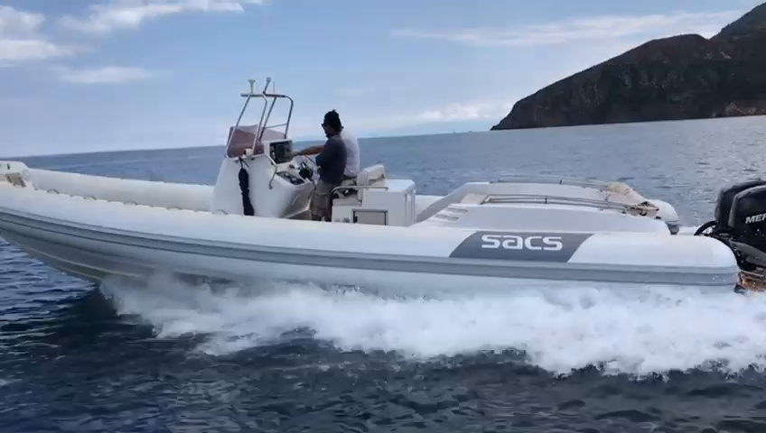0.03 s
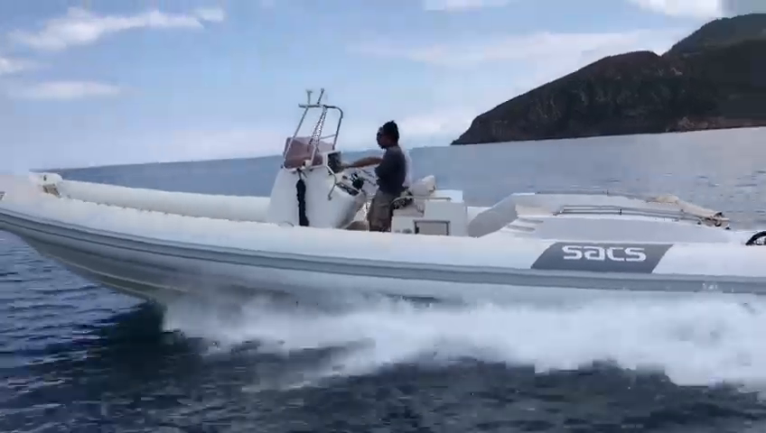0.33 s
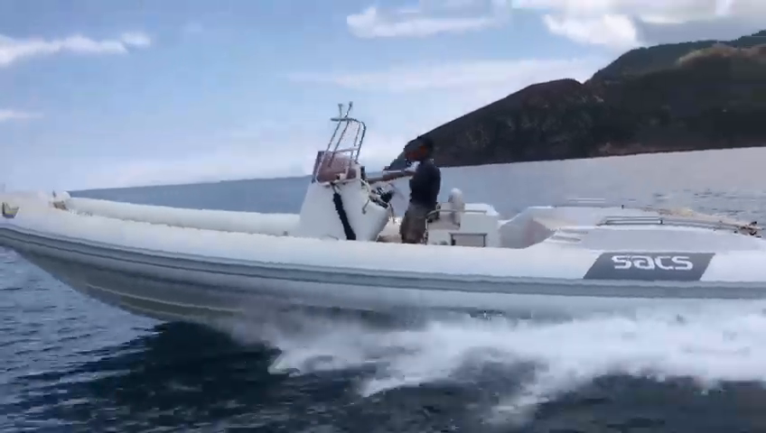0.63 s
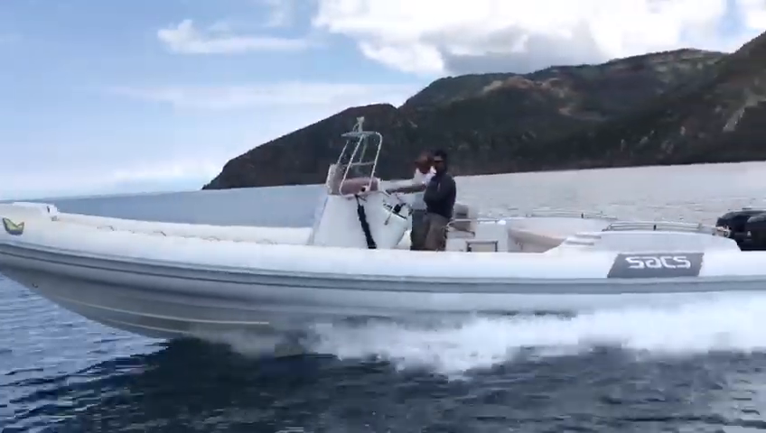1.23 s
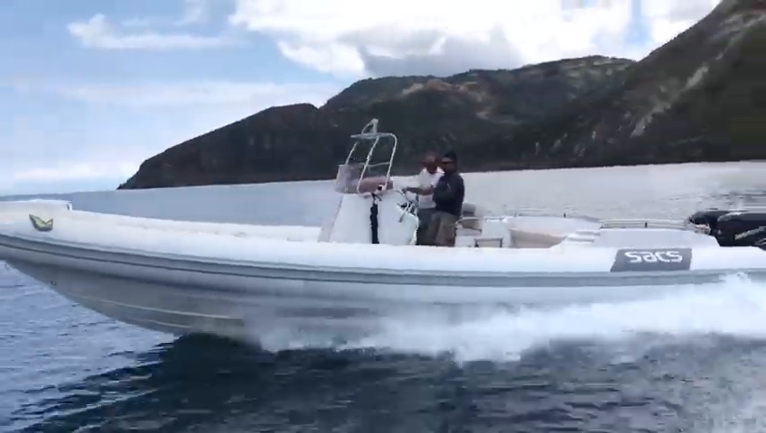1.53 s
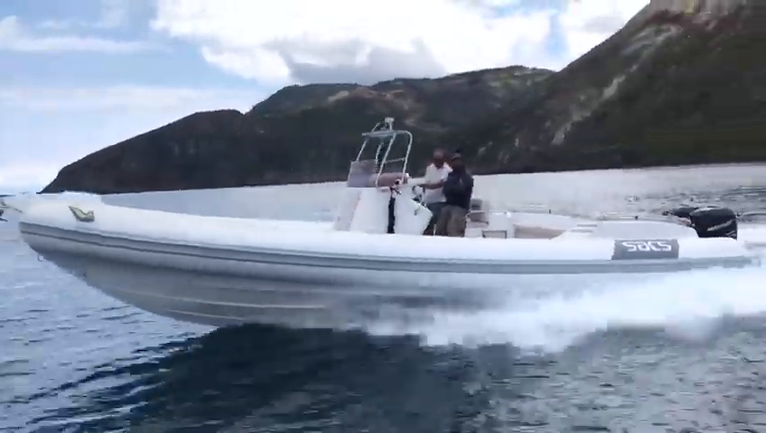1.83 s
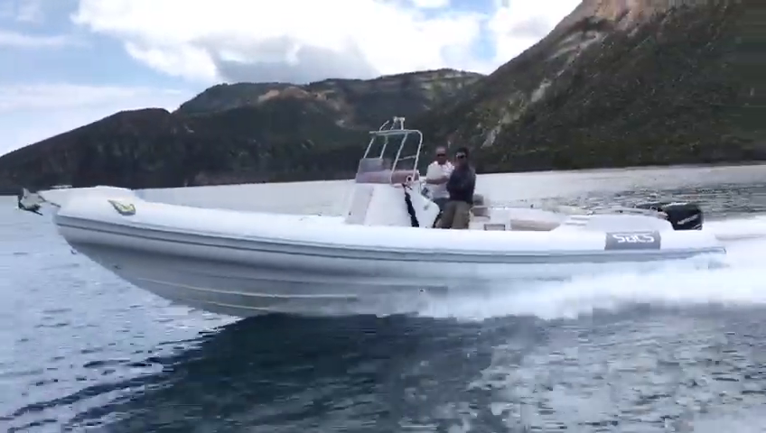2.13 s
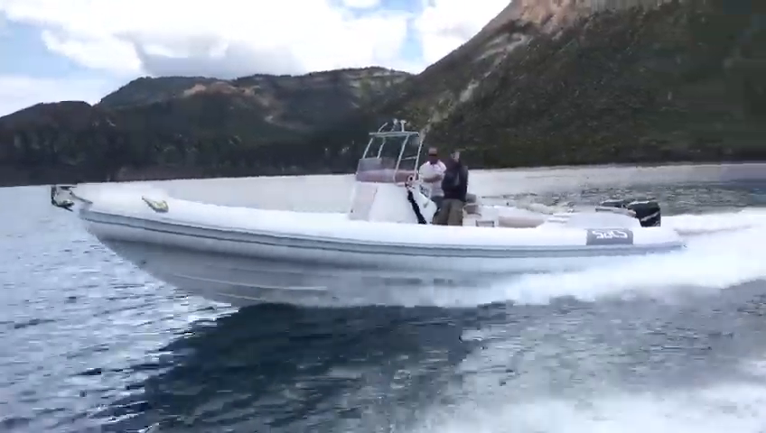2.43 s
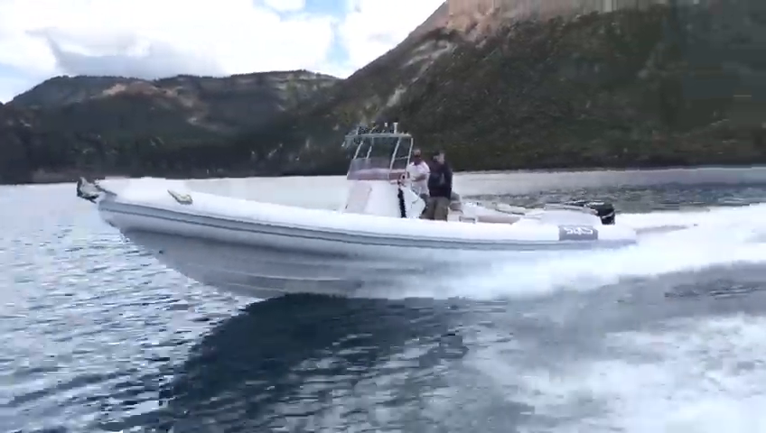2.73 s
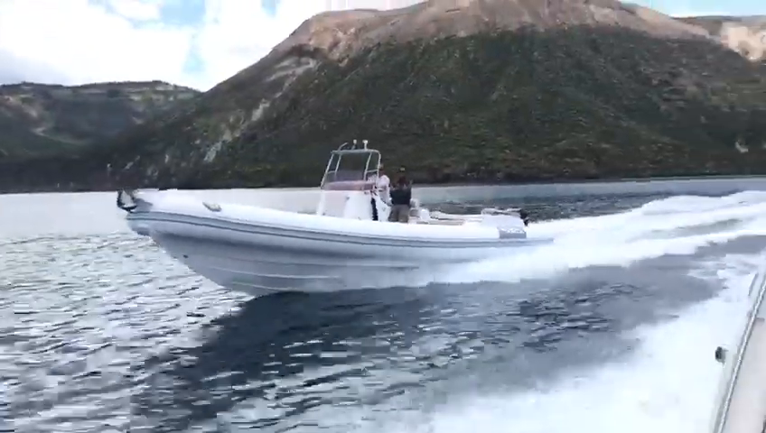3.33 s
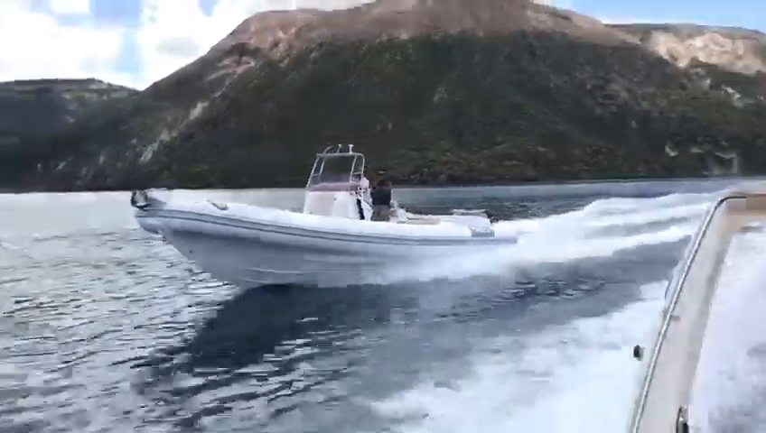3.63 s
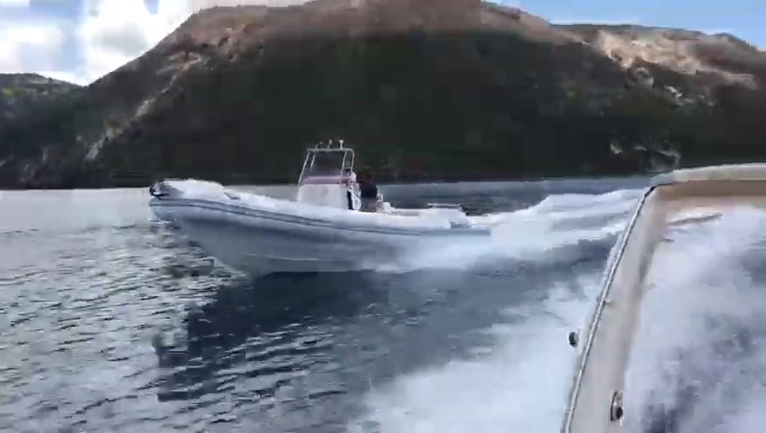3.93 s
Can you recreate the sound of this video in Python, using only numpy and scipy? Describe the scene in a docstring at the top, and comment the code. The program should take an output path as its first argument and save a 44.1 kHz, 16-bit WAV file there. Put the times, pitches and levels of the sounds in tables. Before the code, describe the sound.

Gusty wind rumbles and thumps on the microphone as speeding boats drone and throw spray.

```python
"""Wind buffets the microphone with fluttering gusts, low thumps and pops, on a fast boat in open water.
These are the pressure swings of passing eddies; a limiter holds down the strongest of them.
Spray hisses off the hulls as broadband noise. Two engines, one underfoot and one in a speedboat
alongside, drone at multiples of their firing rates, and a thin whine lies high above them."""
import sys
import numpy as np
from scipy import signal
from scipy.fft import rfft, irfft
from scipy.io import wavfile
from scipy.ndimage import uniform_filter1d, minimum_filter1d, map_coordinates

SR = 44100
rng = np.random.default_rng(int(sys.argv[2]) if len(sys.argv) > 2 else 0)


def persist_wave(psi):
    """Save psi, clipped to +-1, as 16-bit WAV."""
    counts = np.round(np.clip(psi, -1, 1) * 32767).astype(np.int16)
    wavfile.write(sys.argv[1], SR, np.atleast_2d(counts).T)


N = 176400

# gusts at the microphone: centre t/s, duration/s, relative level/dB, nominal upper edge f/Hz
GUST_EVENTS = [(0.269, 0.012, -11, 770), (.295, 0.042, -17.5, 280), (0.594, 0.0089, -9, 900),
               (0.652, 0.0091, -12.5, 790), (0.702, 0.005, -9, 690), (.73, 0.01, -12, 870),
               (0.761, 0.026, -5, 1040), (0.988, 0.0092, -11.5, 660), (1.18, .04, -16.5, 375),
               (1.251, 0.013, -19, 800), (1.639, 0.021, -3.5, 1320), (1.67, 0.0089, -6.5, 1440),
               (1.694, 0.0035, -8, 1300), (1.717, 0.0078, -7.5, 1380), (1.893, 0.0058, -18, 800),
               (1.922, 0.012, -9, 840), (1.991, 0.0097, -14.5, 910), (2.045, .011, -18.5, 790),
               (2.33, 0.0085, -5.5, 1670), (2.353, 0.016, -11.5, 1670), (2.413, 0.014, -7.5, 1230),
               (2.437, 0.018, -15.5, 1020), (2.479, 0.008, -13, 1040), (2.524, 0.012, -13, 1010),
               (2.607, 0.021, -12, 1190), (2.661, 0.026, -9.5, 1000), (2.703, 0.015, -11.5, 1270),
               (2.856, 0.012, -13, 785), (2.895, 0.0087, -3, 1140), (2.913, 0.011, -6.5, 1180),
               (3.025, 0.006, -12, 830), (3.052, 0.0085, -11, 1030), (3.151, 0.0125, -15, 1010),
               (3.197, 0.024, -8.5, 950), (3.275, .011, -9, 900), (3.44, 0.011, -10, 1140),
               (3.521, 0.0047, -7.5, 1360), (3.56, 0.0083, -9.5, 1500), (3.579, 0.0061, -7, 1180),
               (3.637, 0.0099, -10, 980), (3.67, 0.019, -15, 850), (3.708, 0.0073, -14, 1200),
               (3.738, 0.007, -8.5, 1390), (3.795, 0.009, -6, 670), (3.874, 0.0049, -6, 1780),
               (3.893, 0.0038, -10.5, 1900), (3.903, 0.0046, -10, 1140), (3.924, 0.0068, -18, 1300)]
# large, slow eddies: centre t/s, duration/s, relative level/dB
THUMP_EVENTS = [(0.226, 0.041, -11.5), (0.278, 0.024, -13.5), (0.368, 0.031, -12), (0.603, 0.022, -11),
                (0.664, 0.03, -13), (0.771, 0.017, -9), (0.988, 0.032, -12.5), (1.202, 0.023, -17.5),
                (1.339, 0.037, -17.5), (1.635, 0.034, -4.5), (1.69, 0.02, -3.5), (1.991, 0.017, -13),
                (2.358, 0.038, -10), (2.432, 0.017, -6), (2.61, 0.016, -7.5), (2.702, 0.027, -9),
                (2.912, 0.033, -8), (3.054, 0.011, -4.5), (3.155, 0.021, -8), (3.283, 0.016, -10),
                (3.384, .02, -16.5), (3.45, 0.029, -10), (3.522, 0.013, -4), (3.575, 0.021, -6.5),
                (3.638, 0.014, -11), (3.727, 0.029, -10), (3.791, 0.062, -8), (3.905, 0.02, -4)]
# small vortices where the airflow breaks away: centre t/s, envelope level/dB, f/Hz
POP_EVENTS = [(.701, -11, 590), (1.638, -7, 1900), (1.6794, 0.5, 2600), (1.6803, -2, 700),
              (1.7135, -10, 1190), (2.334, -6.5, 2020), (2.479, -11, 746), (2.678, -2, 900),
              (2.912, -10, 1600), (3.056, -6, 630), (3.438, -5, 1080), (3.5189, 1, 1090), (3.56, 0, 1220),
              (3.579, -9.5, 2470), (3.63, -8.5, 1400), (3.658, -3.5, 1290), (3.798, -13, 1400),
              (3.876, -8, 2600)]
# noise spectra of the airflow, the spray and the wash along the hull: f/Hz, relative density level/dB
WIND_SPECTRUM = [(15, -44), (30, -38), (48, -5.5), (75, 4.5), (120, -8), (230, -7.5), (340, -14),
                 (520, -20.5), (750, -27), (1400, -41), (3000, -73)]
SPRAY_SPECTRUM = [(200, -12), (600, 0), (1200, 3), (2000, -0.5), (3000, -1), (4400, -1.5), (4900, -5),
                  (5400, -2.5), (6800, -3.5), (7600, -7), (8400, -5), (9900, -6.5), (10450, -14.5),
                  (11100, -5.5), (11700, -28.5)]
WASH_SPECTRUM = [(100, -9.5), (300, -3.5), (500, -4.5), (800, -2), (1200, -15.5), (2000, -29), (4000, -53)]
# exhaust partials of the boats alongside (far) and underfoot (near): order, relative level/dB
FAR_PARTIALS = [(1, 2.5), (1.5, -14.5), (3, -19.5), (5, -14.5)]
NEAR_PARTIALS = [(1, 3.5), (3, -12.5)]
# envelopes of the continuous sources: t/s, relative level/dB
WIND_ENVELOPE = [(.1, -23), (.5, -22), (.8, -19.5), (1.6, -18.5), (1.72, -28.5), (1.82, -26), (1.96, -22.5),
                 (2.13, -27.5), (2.35, -17.5), (2.8, -22.5), (3.3, -21.5), (3.75, -21.5), (4, -18)]
SPRAY_ENVELOPE = [(.1, -30.5), (.16, -31), (.24, -28.5), (.5, -29), (.68, -32.5), (.95, -30.5),
                  (1.25, -27.5), (1.6, -26.5), (1.72, -34), (1.83, -39.5), (1.93, -34), (2.08, -34.5),
                  (2.3, -30), (2.6, -31), (2.95, -34.5), (3.2, -32), (3.48, -30), (3.72, -33.5), (4, -34.5)]
FAR_ENVELOPE = [(.1, -28), (.17, -19.5), (.53, -19), (.7, -30.5), (1.06, -25.5), (1.18, -21.5), (1.52, -20),
                (1.8, -42), (2.252, -33.5), (4, -42)]
NEAR_ENVELOPE = [(.5, -34), (1, -18.5), (1.35, -18), (1.6, -21), (1.8, -36), (2.1, -40), (2.25, -19.5),
                 (2.6, -33.5), (4, -34)]
WHINE_ENVELOPE = [(.1, -41), (.3, -36.5), (.85, -35), (1.1, -38), (1.29, -31.5), (1.76, -40.5), (1.96, -35),
                  (2.08, -40.5), (2.3, -36), (2.88, -39), (2.98, -28), (3.18, -37), (3.32, -28),
                  (3.55, -31), (3.74, -34), (4, -24.5)]

FAR_FIRING_HZ, NEAR_FIRING_HZ = 156.5, 87.64
PORT_HZ, PORT_HALF_WIDTH_HZ, PORT_DB = 490, 230, 7.5  # hollow resonance of the microphone port


def gusts(gain_db=-3, churn_db=1.5, size=8192):
    """Convected turbulence: the faster eddies sweep past the resonant port, the brighter they sound."""
    out, hz = np.zeros(N), np.fft.rfftfreq(size, 1 / SR)
    resonance = amp(PORT_DB / (1 + ((hz - PORT_HZ) / PORT_HALF_WIDTH_HZ) ** 2))
    for centre, length, db, edge_hz in GUST_EVENTS:
        grain, jitter = rng.standard_normal((2, size))
        shape = swell(length, size, rise=0.408)
        churn = amp(churn_db * unit(band(jitter, low_hz=82.5, high_hz=165, slope=1.27)))
        speed = (.7 + .3 * shape) * churn  # unsteady flow, fastest around the crest
        eddies = band(grain, low_hz=207, high_hz=edge_hz, slope=4.83)
        swept = map_coordinates(eddies, [np.cumsum(speed)], mode="grid-wrap")
        pressure = irfft(rfft(swept) * resonance) * churn
        add(out, centre, amp(db + gain_db) * burst(pressure, shape))
    return out


def thumps(gain_db=-1.5, size=16384):
    """Large eddies pass slowly, so each gives a few cycles of low-frequency pressure."""
    out = np.zeros(N)
    for centre, length, db in THUMP_EVENTS:
        pressure = band(rng.standard_normal(size), low_hz=46.5, high_hz=103, slope=1.7)
        add(out, centre, amp(db + gain_db) * burst(pressure, swell(length, size)))
    return out


def pops(half_width_cycles=0.55):
    """Flow separation: a vortex crosses the port as one pressure swing, higher the smaller it is."""
    out, t = np.zeros(N), np.arange(-200, 201) / SR
    for centre, db, hz in POP_EVENTS:
        envelope = amp(db) * np.exp(-(hz * t / half_width_cycles) ** 2)
        add(out, centre, envelope * np.sin(2 * np.pi * hz * t))
    return out


def airflow(lumps_db=4):
    """Continuous turbulence: a low rumble, made lumpy by random amplitude modulation."""
    rumble = noise(WIND_SPECTRUM) * level(WIND_ENVELOPE)
    return rumble * unit(amp(lumps_db * drift(hz=31.8)))


def water(spray_db=2, flicker_db=.5, wash_db=-30):
    """Broadband water noise: sheets of spray swell and sink over the steady rush along the hull."""
    spray = noise(SPRAY_SPECTRUM, patch_db=1.1) * level(SPRAY_ENVELOPE)
    spray *= amp(spray_db + flicker_db * drift(hz=45))
    wash = amp(wash_db) * noise(WASH_SPECTRUM, patch_db=3.5)
    return spray + wash


def engine(firing_hz, partials, envelope, wander=0.0065, flutter_db=2.4):
    """Periodic firing gives exhaust tones at orders of its rate, each wavering in the moving air."""
    cycles = np.cumsum(firing_hz * (1 + wander * drift(hz=12.3))) / SR
    tones = np.zeros(N)
    for order, db in partials:
        gain = amp(db + flutter_db * drift(hz=32))
        tones += gain * np.sin(2 * np.pi * (order * cycles + rng.random()))
    return unit(tones) * level(envelope)


def whine(high_hz=11153, wander_hz=8.9, flutter_db=2, faint_hz=3160, faint_db=-51):
    """Random modulation spreads a thin, high tone into fuzzy sidebands; a faint tone lies below it."""
    cycles = np.cumsum(high_hz + wander_hz * drift(hz=11.9)) / SR
    fuzz = 0.36 * (drift(hz=65.4) + 1j * drift(hz=65.4))  # modulates both amplitude and phase
    tone = (np.exp(2j * np.pi * cycles) * (1 + fuzz)).real
    high = unit(tone * amp(flutter_db * drift(hz=23.2))) * level(WHINE_ENVELOPE)
    faint_cycles = np.cumsum(faint_hz * (1 + 0.00203 * drift(hz=10.6))) / SR
    return high + amp(faint_db) * unit(np.sin(2 * np.pi * faint_cycles))


def amp(db):
    """Amplitude ratio of a level in decibels."""
    return 10 ** (np.asarray(db) / 20)


def unit(x):
    """Normalisation to rms 1."""
    return x / np.sqrt(np.mean(x ** 2) + 1e-20)


def level(points):
    """Gain at every sample, interpolated in decibels between (t/s, level/dB) points."""
    return amp(np.interp(np.arange(N) / SR, *np.transpose(points)))


def add(mix, centre, sound):
    """Superposition of a sound on the mix, centred on a time in seconds."""
    at = round(centre * SR) - len(sound) // 2 + np.arange(len(sound))
    inside = (at >= 0) & (at < N)
    mix[at[inside]] += sound[inside]


def drift(hz):
    """Low-pass noise of rms 1: random movement up to the given rate."""
    f = np.fft.rfftfreq(N, 1 / SR)
    return unit(irfft(rfft(rng.standard_normal(N)) / (1 + (f / hz) ** 4), N))


def noise(spectrum, patch_db=0):
    """Spectral shaping of white noise, with random patches of level over time and frequency."""
    hz, _, white = signal.stft(rng.standard_normal(N), SR, nperseg=2048)
    f, db = np.transpose(spectrum)
    colour = amp(np.interp(np.log(hz + 1), np.log(f), db))
    coloured = signal.istft(white * colour[:, None], nperseg=2048)[1][:N]
    frames = signal.stft(coloured, nperseg=512)[2]
    patches = uniform_filter1d(rng.standard_normal(frames.shape), size=7, axis=0)
    patches = unit(uniform_filter1d(patches, size=8, axis=1))
    return unit(signal.istft(frames * amp(patch_db * patches), nperseg=512)[1][:N])


def band(x, low_hz, high_hz, slope):
    """Band-pass filter: third order below low_hz, of order slope above high_hz."""
    f = np.fft.rfftfreq(len(x), 1 / SR) + 1
    power_loss = (1 + (low_hz / f) ** 6) * (1 + (f / high_hz) ** (2 * slope))
    return irfft(rfft(x) / np.sqrt(power_loss), len(x))


def swell(length, size, rise=0.61, skirt=1.842):
    """Envelope whose half-power width is length seconds; rise is the share before the crest."""
    t = (np.arange(size) - size // 2) / SR / length + .5 - rise
    return 2 ** (-.5 * abs(t / np.where(t < 0, rise, 1 - rise)) ** skirt)


def burst(x, shape):
    """Windowing of noise into a burst with rms 1 at its crest."""
    return unit(x * shape) * np.sqrt(np.mean(shape ** 2))


def scene():
    """Superposition of wind, water, engines and whine at one microphone."""
    far = engine(FAR_FIRING_HZ, FAR_PARTIALS, FAR_ENVELOPE)
    near = engine(NEAR_FIRING_HZ, NEAR_PARTIALS, NEAR_ENVELOPE)
    wind = gusts() + thumps() + pops() + airflow()
    return (wind + water() + far + near + whine())[None]


def record(dry):
    """Band and peak limiting: the microphone switches on, loses both extremes and holds down peaks."""
    start_s, fade_s, low_cut_hz, high_cut_hz = 0.083, .003, 31, 11750
    switch_on = np.clip((np.arange(N) / SR - start_s) / fade_s, 0, 1)
    x = signal.sosfiltfilt(signal.butter(4, low_cut_hz, "highpass", fs=SR, output="sos"), dry)
    gain = (1 + x ** 8) ** (-1 / 8)  # soft limiting toward full scale
    gain = uniform_filter1d(minimum_filter1d(gain, size=45), size=45)  # held and smoothed over 1 ms
    low_pass = signal.firwin(511, high_cut_hz, window=("kaiser", 9), fs=SR)
    return signal.oaconvolve(switch_on * gain * x, low_pass[None], "same")


dry = scene()
out = record(dry)
persist_wave(out)
```